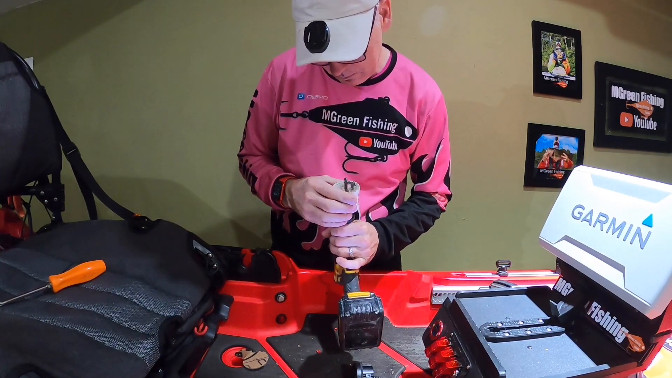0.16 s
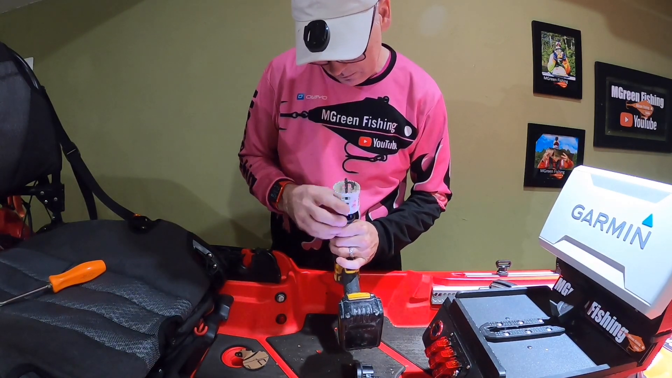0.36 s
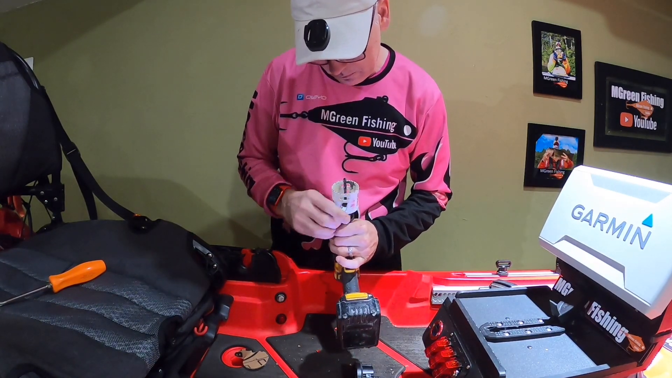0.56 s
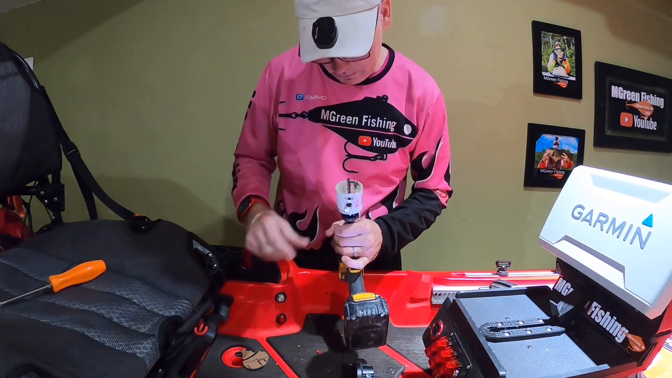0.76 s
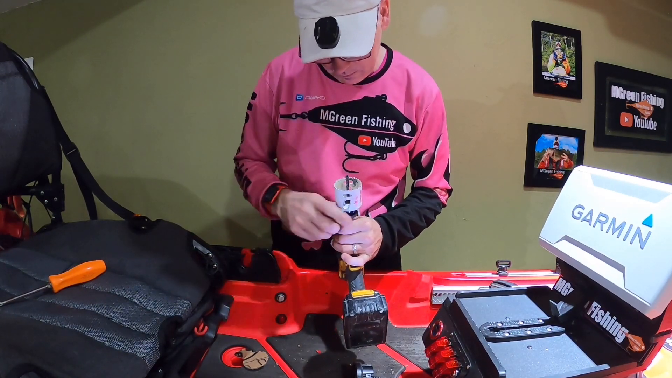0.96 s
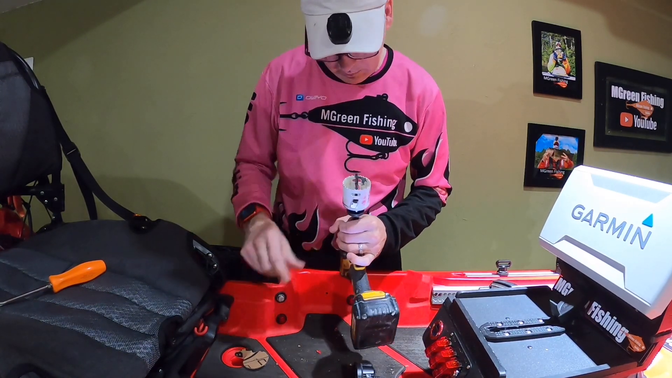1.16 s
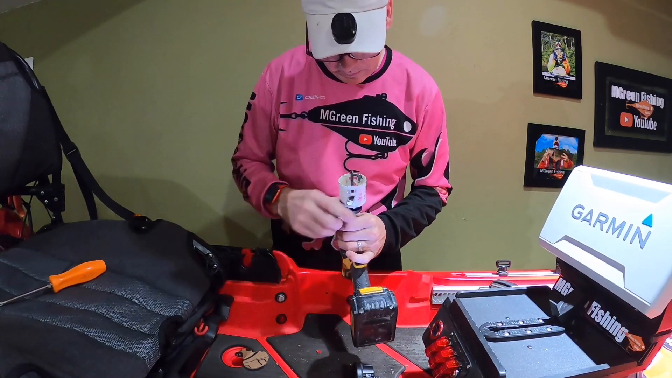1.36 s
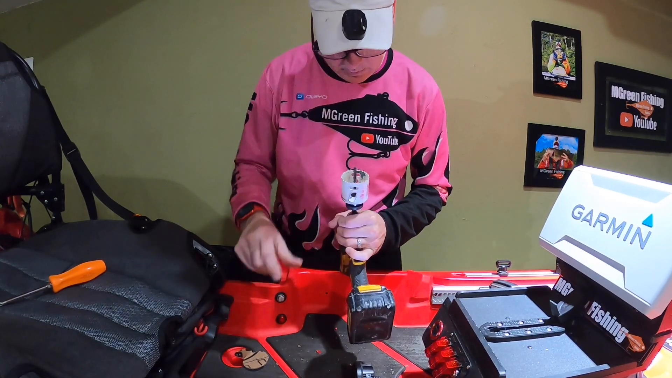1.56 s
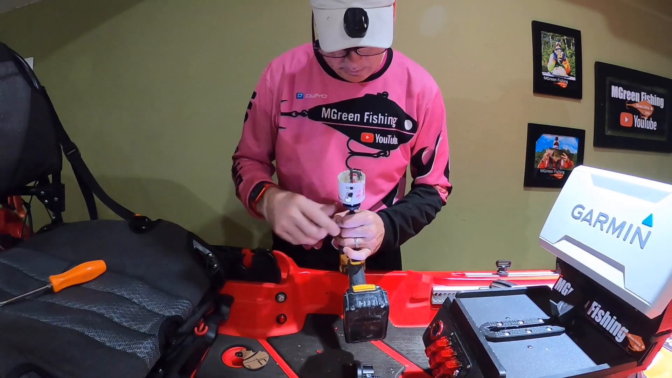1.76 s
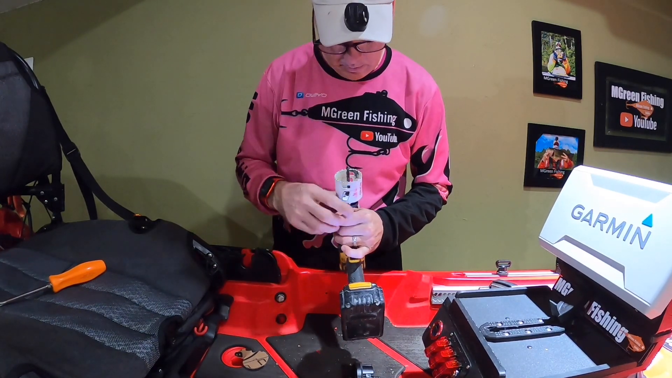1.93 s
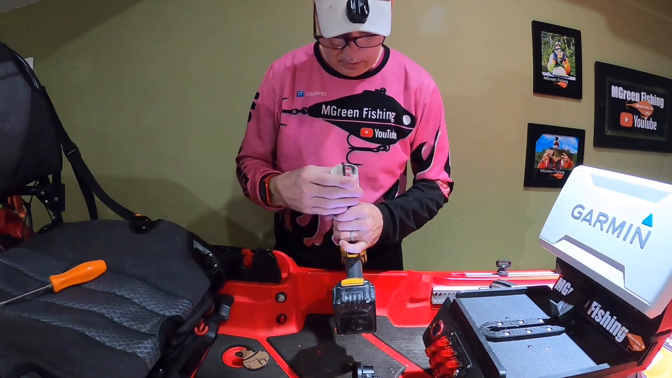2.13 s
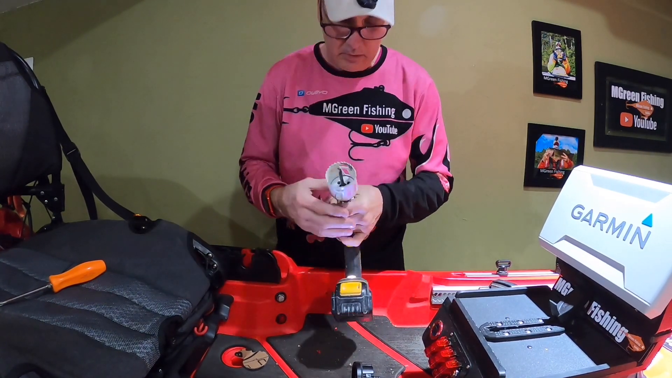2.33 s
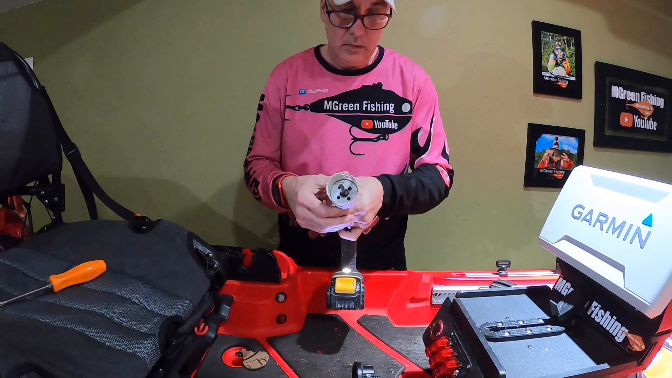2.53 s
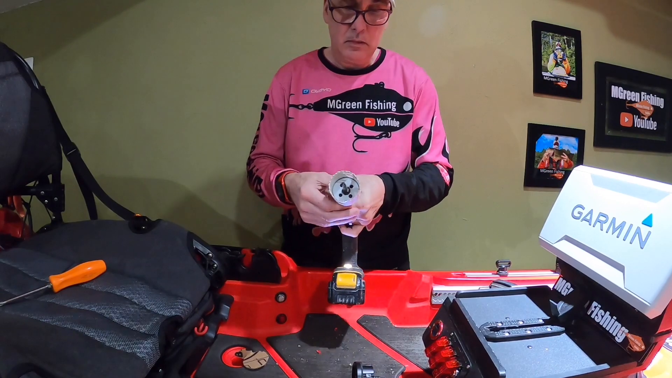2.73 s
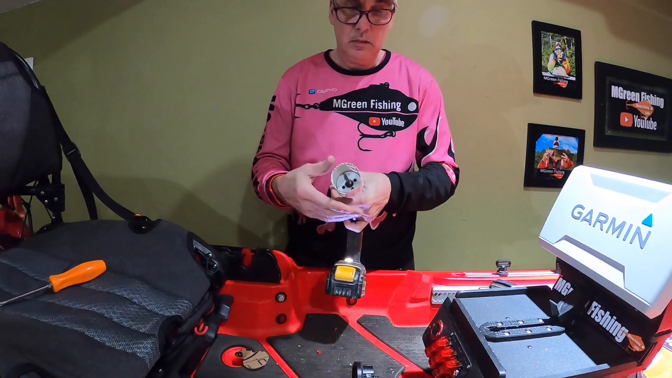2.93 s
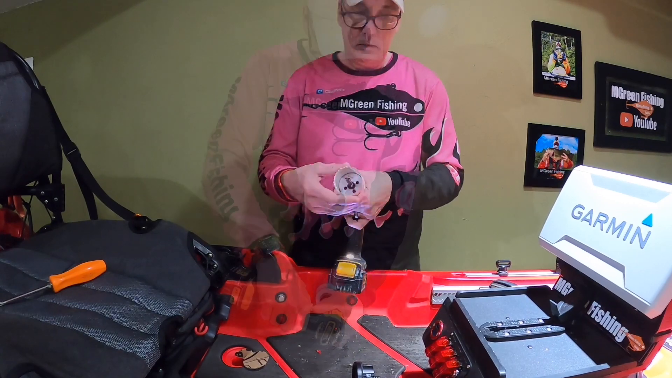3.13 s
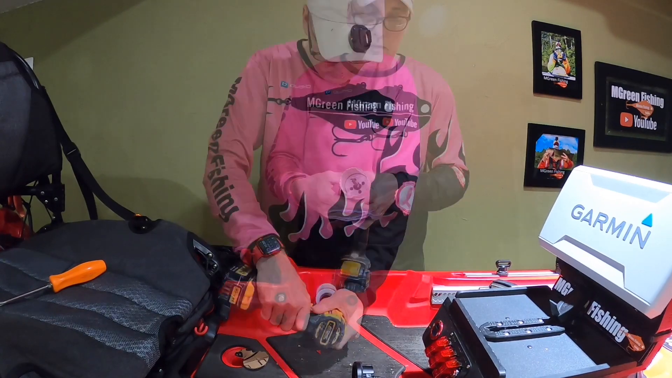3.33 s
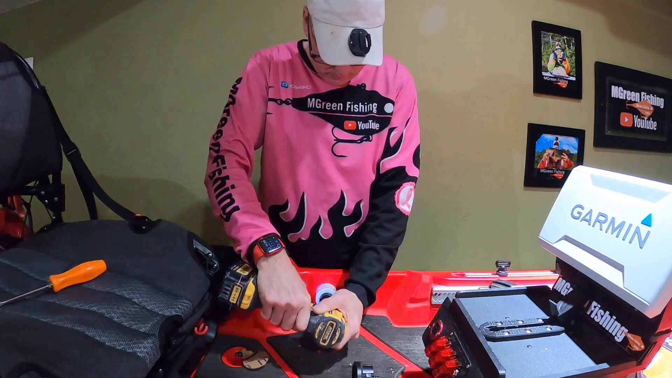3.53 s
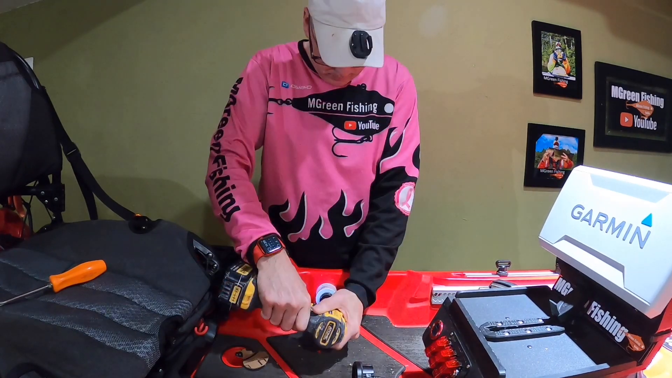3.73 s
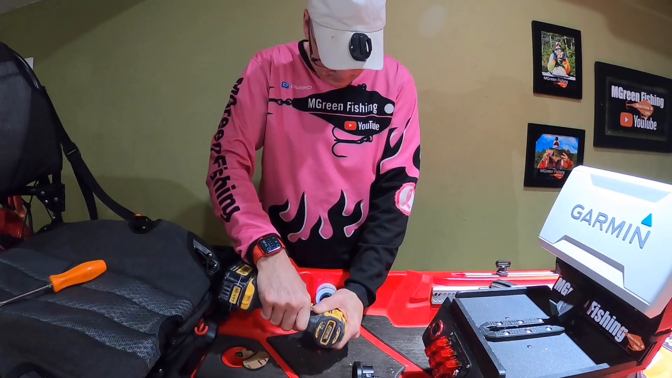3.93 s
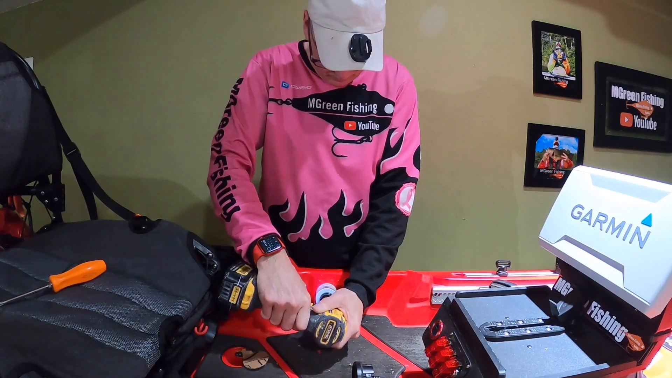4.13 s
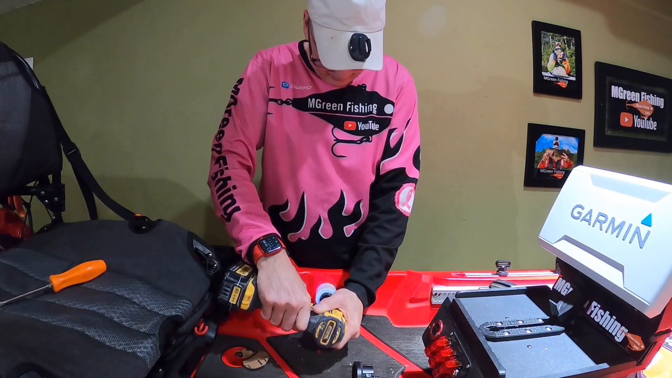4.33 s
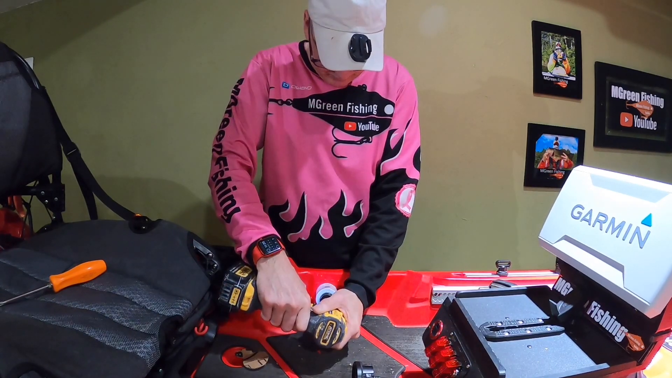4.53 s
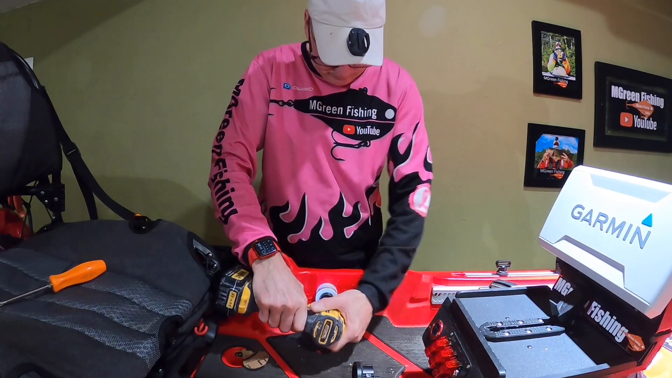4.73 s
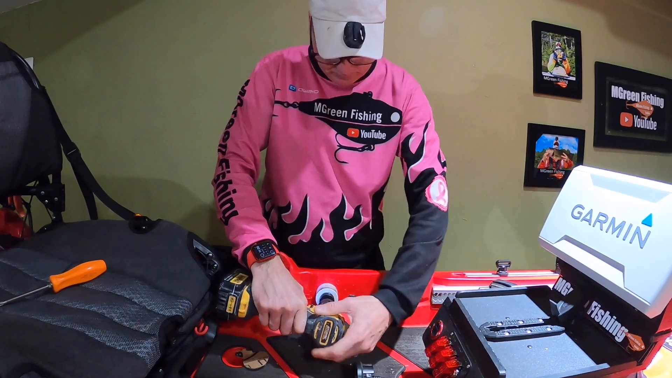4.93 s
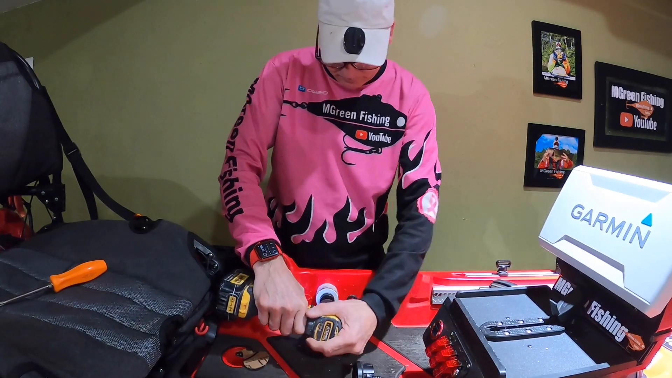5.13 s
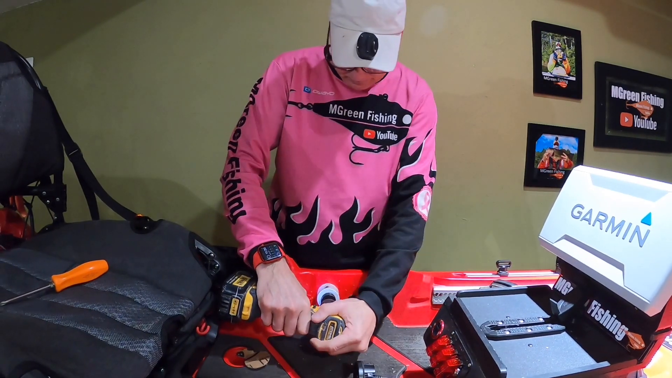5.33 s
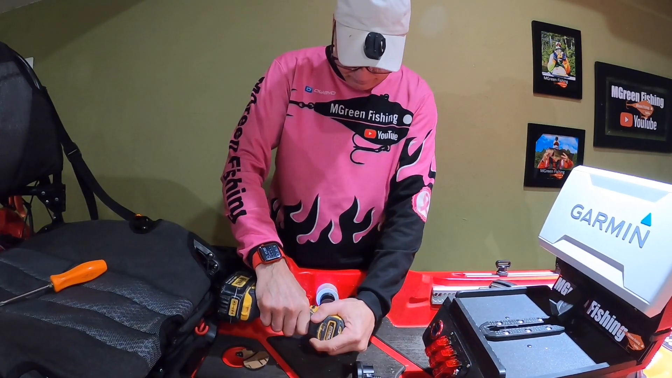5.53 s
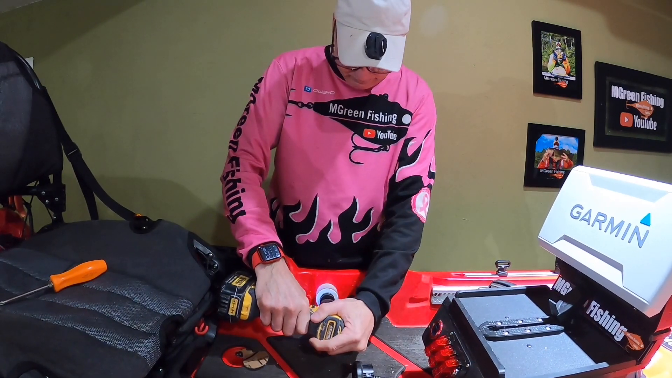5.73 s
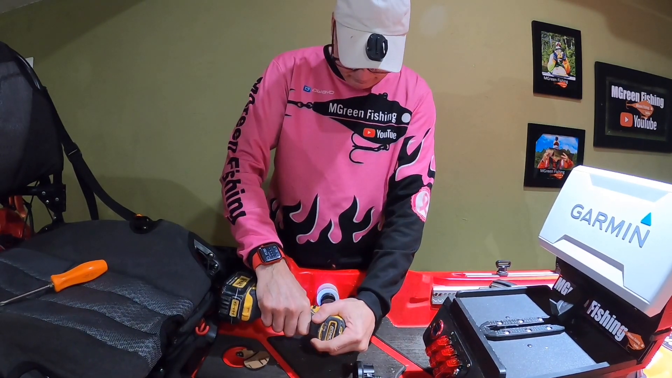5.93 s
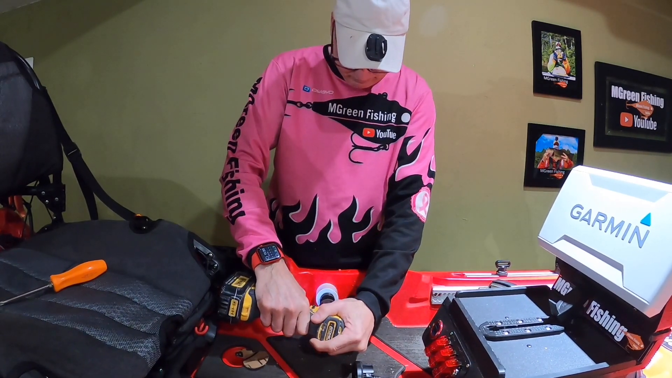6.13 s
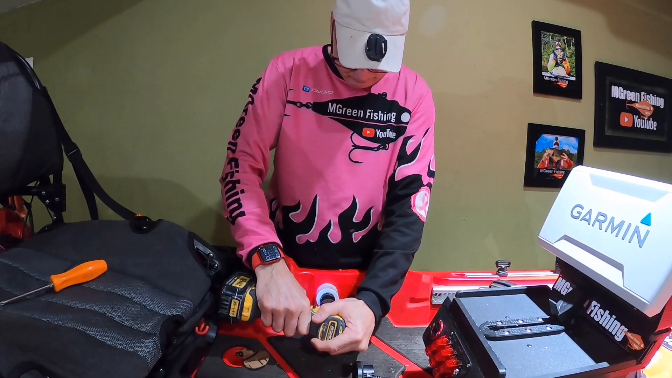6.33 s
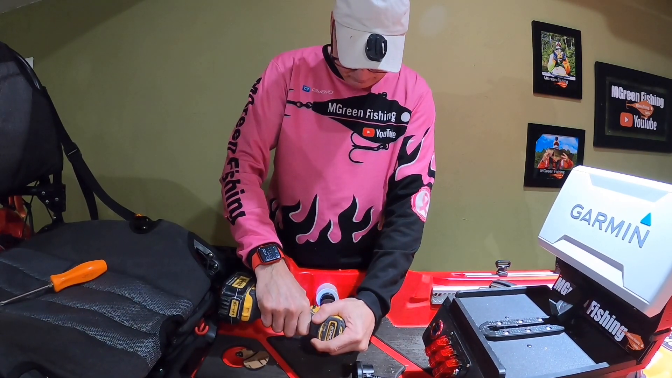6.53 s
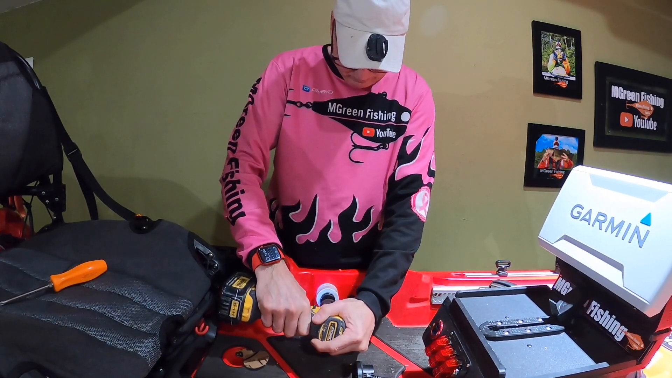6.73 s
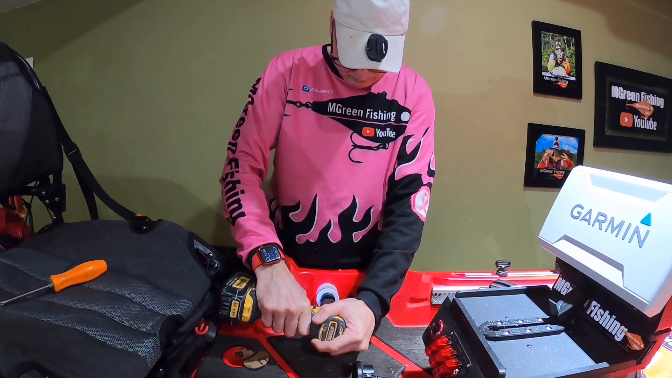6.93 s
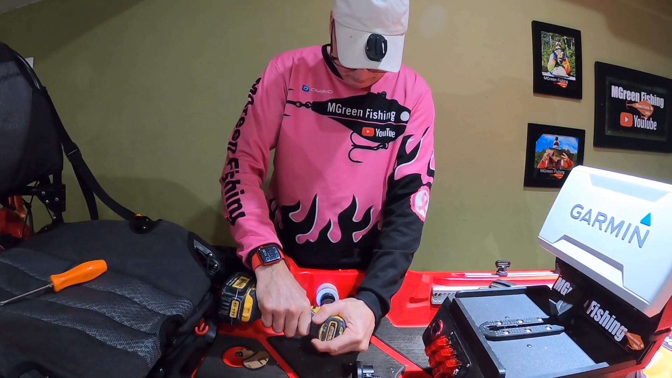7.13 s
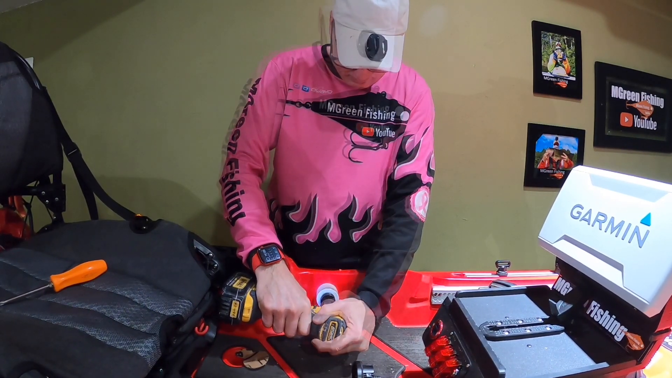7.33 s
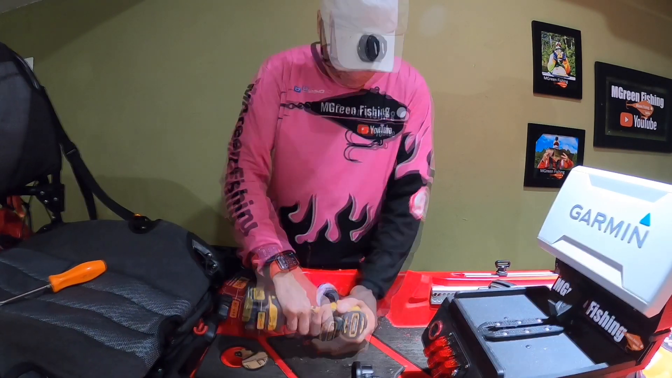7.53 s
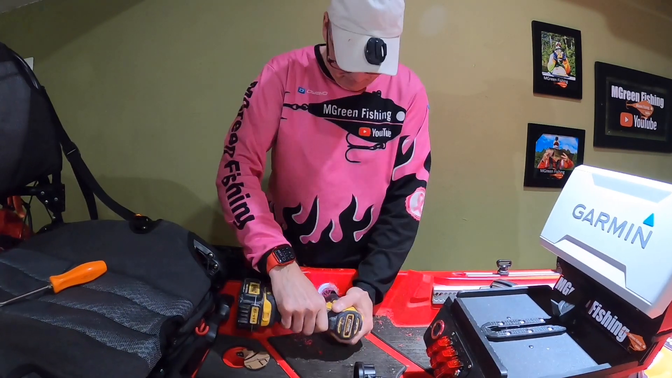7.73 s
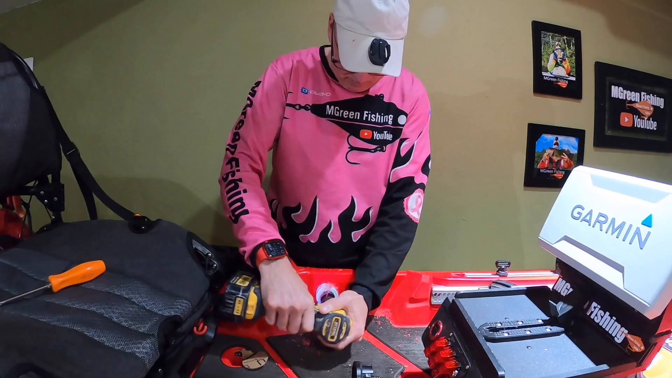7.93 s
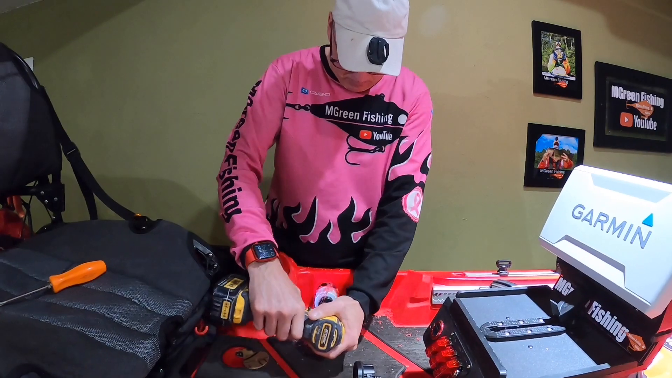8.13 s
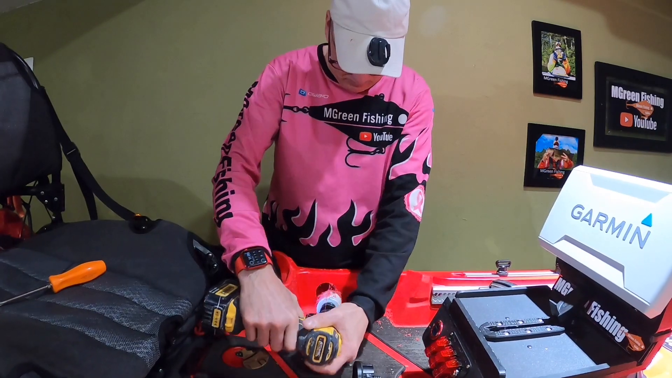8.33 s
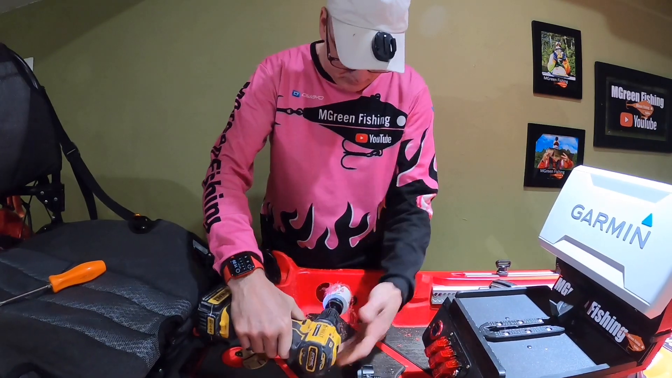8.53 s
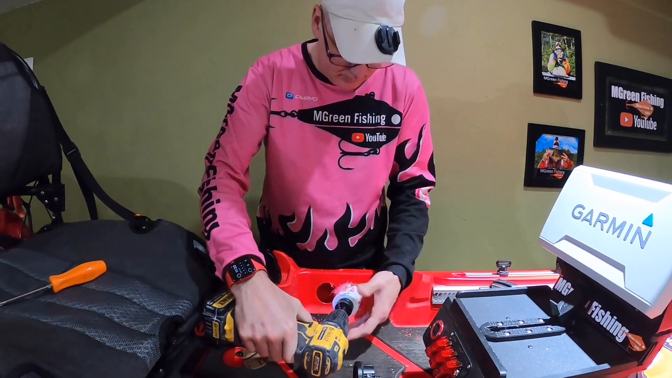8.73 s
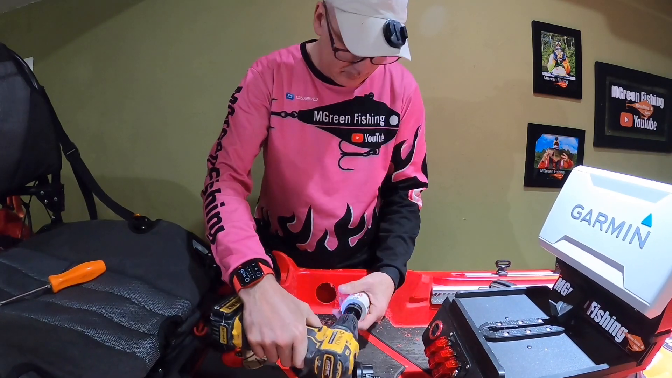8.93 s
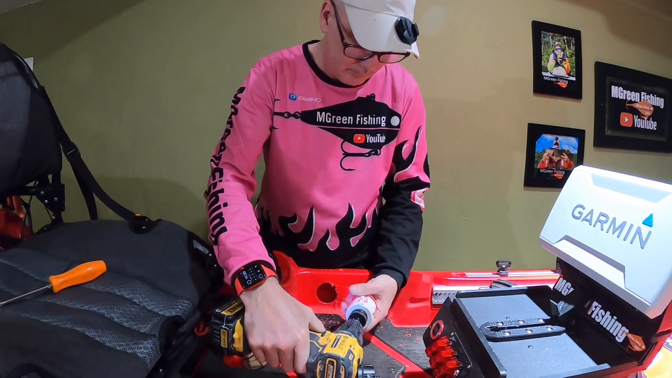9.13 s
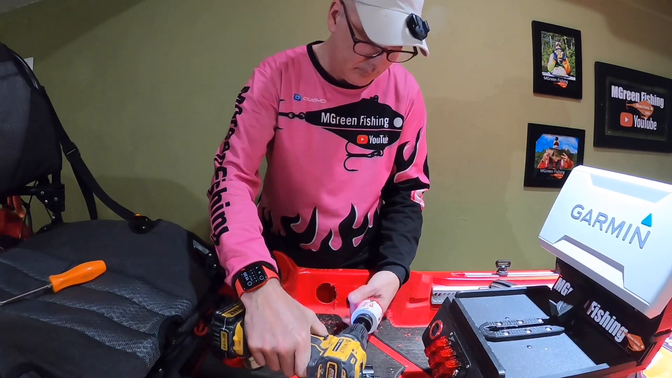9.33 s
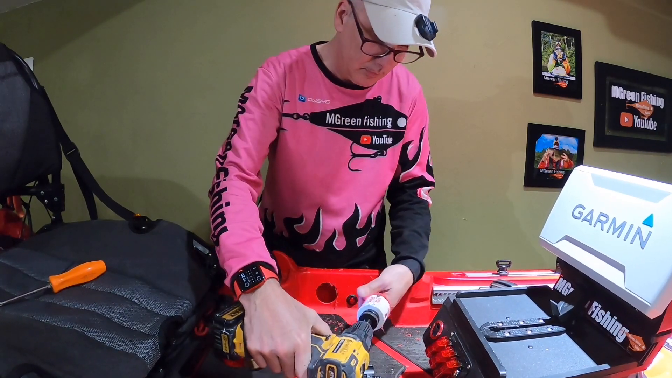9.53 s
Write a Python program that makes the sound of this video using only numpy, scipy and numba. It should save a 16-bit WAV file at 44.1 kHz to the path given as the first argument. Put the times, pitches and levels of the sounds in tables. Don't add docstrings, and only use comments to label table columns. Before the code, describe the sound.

Heard from about a metre by a small stereo microphone: quiet room rumble, several ringing clinks of a metal cup, the last firmest. Then a cordless drill grinds through a hollow plastic shell for almost five seconds, growling, squealing and whining at changing speeds. It bursts through with clustered hollow thuds and winds down abruptly, leaving brief rubbing strokes, a deck knock, cloth rustle and tiny ticks in a short, dry room.

```python
import sys
import numpy as np
from scipy import signal
from scipy.fft import rfft, irfft, next_fast_len
from scipy.io import wavfile
from scipy.ndimage import uniform_filter1d
from numba import njit

SR = 44100
rng = np.random.default_rng(int(sys.argv[2]) if len(sys.argv) > 2 else 0)


def digitize_waveform(pressure):
    field = np.atleast_2d(pressure).T
    bounded = np.clip(field, -1, 1)
    quanta = np.round(bounded * 32767).astype(np.int16)
    wavfile.write(sys.argv[1], SR, quanta)


def to_linear_factor(level_db):
    exponent = np.asarray(level_db, float) / 20
    return 10 ** exponent


N = 426006
T = np.arange(N) / SR
SIZE = next_fast_len(N + SR)
HZ = np.arange(SIZE // 2 + 1) * SR / SIZE

# frequency_hz, level_db (per Hz)
AIR = [(15, -53), (27, -22), (39, -4), (60, 2), (72, -4), (86, -16.5), (152, -10), (225, -29.5),
       (269, -30.5), (306, -37), (700, -54.5), (1110, -47), (2180, -56), (5970, -71), (12000, -82.5),
       (15600, -111), (22000, -120)]
# pitch_hz, level_db
HUM = [(1130, -82.5), (1330, -92.5)]
# frequency_hz, lead_rad
PORT_LEAD = [(30, -.03), (860, -.4), (2670, -.8), (6000, -1.1), (8000, -2.05), (10000, -1.7), (14000, -3.5)]
# frequency_hz, difference_db
PORT_LEVEL = [(60, 0), (110, 1.5), (200, 1.5), (380, 1), (700, 1), (1290, 0.5), (2380, 2.0), (4400, 1.5),
              (8120, 0.0), (15000, -17.5)]
# frequency_hz, level_db
ROOM_SHARE = [(60, -29.5), (300, -15.5), (1000, -8.5), (3000, -20.5), (6000, -10), (9000, -9),
              (14000, -13.5)]
# start_s, end_s, level_db, fade_db_per_s
BRUSHES = [(8.05, 8.117, -65.5, 302), (8.455, 8.52, -74, 300), (8.641, 8.77, -80, 202),
           (8.945, 9.05, -74.5, 104.5), (9.072, 9.227, -70, 300), (9.303, 9.37, -71, 98),
           (9.602, 9.66, -75.5, 205)]
# centre_hz, width_hz, level_db
CLOTH_BANDS = [(2900, 900, -3), (4300, 1300, 0), (5800, 1400, -2), (7300, 1400, -4), (9500, 1600, -6),
               (12000, 2500, -13)]
# start_s, end_s, level_db, fade_db_per_s, centre_hz
STROKES = [(8.06, 8.103, -47.5, 250, 1500), (8.12, 8.16, -65, 92, 1200), (8.46, 8.514, -68, 200, 1140),
           (8.64, 8.677, -50.5, 101, 1130), (8.72, 8.785, -76, 400, 1040), (8.826, 8.88, -75, 98, 1200),
           (9.028, 9.045, -63, 198, 1450), (9.09, 9.12, -61.5, 200, 2100), (9.157, 9.221, -62.5, 300, 1790),
           (9.265, 9.303, -66.5, 100, 1630), (9.335, 9.37, -69, 97, 1770), (9.44, 9.5, -73.5, 100, 1490),
           (9.605, 9.66, -61.5, 199, 1710)]
# start_s, peak_db, sharpness (0-1)
THUDS = [(3.2597, -12.5, 0.92), (3.273, -16.5, 0.43), (3.288, -17.5, 0.13), (7.472, -20, 0.3),
         (7.51, -10, 0), (7.533, -18, 0.03), (7.569, -15, 0.35), (7.599, -16.5, 0.44), (7.683, -14, 0.05),
         (7.76, -17.5, 0.3), (7.837, -20.5, 0.8), (7.95, -29, 0.1), (8.06, -17.5, 0.06), (8.621, -28.5, 0)]
# pitch_hz, level_db, t60_s
HULL = [(102, -5.5, 0.2), (137, -0.5, 0.17), (247, -7.5, 0.047), (290, -5.5, 0.33), (381, -2.5, 0.54),
        (474, -22, 0.17), (533, -18.5, 2.1), (662, -26, 4.7)]
# start_s, peak_db
KNOCKS = [(8.6195, -27)]
# pitch_hz, level_db, t60_s
DECK = [(150, -8.5, 5.0), (624, -29, 0.22), (670, -27.5, 5.0), (1005, -2, 0.13), (980, -17, 0.34),
        (1140, 0, 0.1), (1260, -23, 0.44), (1357, -30, 1.1), (1470, -29, 0.8), (1813, -3, 0.24),
        (1997, -32.5, 5.0)]
# start_s, peak_db, centre_hz, width_hz
TICKS = [(2.2149, -56.5, 2700, 1800), (3.066, -50, 2000, 2500), (7.468, -17.5, 1500, 700),
         (7.47, -17, 3000, 800), (7.8296, -25, 3920, 1787), (7.9024, -24, 3000, 1200),
         (7.934, -23, 4340, 1800), (7.9483, -21.5, 1800, 1200), (7.95, -22, 3250, 1810),
         (8.0475, -33.5, 2037, 900), (8.062, -33, 2810, 1000), (8.599, -53, 1800, 1800),
         (8.864, -60, 2550, 700), (9.5347, -52, 4180, 1210), (8.438, -54.5, 2400, 1000),
         (9.077, -50, 2230, 1200)]
# start_s, peak_db, centre_hz, width_hz
PINGS = [(2.4664, -58, 5010, 3500), (2.7355, -52.5, 5430, 3510), (8.3194, -69, 5530, 3500),
         (8.4155, -58.5, 4100, 3520), (8.454, -56, 5830, 2500), (8.535, -65, 11000, 4000),
         (8.365, -69, 6300, 1200), (8.92, -67, 10000, 4000), (9.4682, -59, 5900, 2000),
         (9.487, -61, 5500, 1000), (9.535, -57, 5800, 1200), (9.535, -61, 9500, 1210)]
# start_s, peak_db, centre_hz, width_hz
TAPS = [(3.258, -20, 600, 600), (2.846, -48, 1220, 900), (8.458, -57, 1060, 900), (8.554, -50, 1278, 894),
        (9.025, -54, 1470, 920), (9.568, -49, 1194, 880)]
# start_s, peak_db, centre_hz, width_hz
SNAPS = [(7.934, -27.5, 7100, 6000), (7.9483, -27, 6500, 6000), (8.09, -53, 6000, 5000)]
# start_s, peak_db, contact_ms, held_t60_s (what the fingers allow), spot struck
CLINKS = [
    (0.6609, -36, 2.5, .5, "lip"),
    (0.6833, -26, 3, .65, "rim"),
    (0.8639, -27, 2.5, .5, "teeth"),
    (1.0949, -32, 1, .3, "edge"),
    (1.1218, -29, 5, 1.1, "wall"),
    (1.1394, -32, 2.5, .3, "edge"),
    (1.484, -34, .9, .4, "wall"),
    (1.5555, -15, 2, .6, "base"),
]
# start_s, end_s, level_db, fade_db_per_s, dull_part_db
SLIDES = [(0.668, 0.877, -53, 280, -4), (1.111, 1.125, -47, 91, -10), (1.499, 1.538, -51, 189, -7),
          (1.56, 1.59, -55, 155.5, -19)]
SPOTS = {"lip": (-19, 2, -38, -26, -30), "rim": (-10, 2.5, -32, -14.5, -25),
         "teeth": (-33, -19, -22.5, 1, -36), "wall": (-4, -9.5, -19, -19, -26),
         "edge": (-20, -10, -34, -7, -27), "base": (-15, -2.5, -31.5, -25, -13)}
# pitch_hz, level_db, t60_s
CUP_LOW = [(1852, 0, 1.1), (1868, -9, .4), (1529, -6, .15), (2150, -8, .06)]
CUP_RIM = [(4925, 0, .14), (4985, -6, .09), (4624, -6, .1), (3467, -12, .1), (5550, -16, .05)]
CUP_MIDDLE = [(3817, 0, .9), (6708, -1, .55), (3391, -6, .4), (6923, -9, .24)]
CUP_HIGH = [(9453, -4, .12), (9700, 0, .035), (10050, -8, .06), (10640, -16, .1), (11090, -18, .08),
            (8700, -15, .1)]
CUP_BASE = [(4113, 0, .24), (4170, -6, .08)]
CUP = (CUP_LOW, CUP_RIM, CUP_MIDDLE, CUP_HIGH, CUP_BASE)
# start_s, peak_db, centre_hz
CHIPS = [(3.3947, -23, 3870), (3.5324, -17, 2590), (3.7065, -15.5, 2570), (3.9235, -16.5, 3870),
         (3.9754, -17, 3760), (4.135, -17, 2530), (4.2428, -10.5, 1510), (4.4793, -14, 2540),
         (4.9652, -18, 2060), (5.1023, -16.5, 4340), (5.2021, -20, 2050), (5.3902, -21, 3820),
         (5.4615, -14, 2500), (5.5404, -15.5, 2490), (5.5927, -14, 2510), (5.7429, -16, 3330),
         (6.1295, -15.5, 2890), (6.2887, -13, 3250), (6.6733, -14, 2220), (6.9377, -10.5, 2370)]
# start_s, end_s, start_hz, end_hz, level_db
GLIDES = [(5.449, 5.53, 2250, 4000, -43), (5.485, 5.552, 1350, 2450, -33), (5.45, 5.475, 2340, 2500, -30),
          (5.5, 5.54, 3750, 3910, -33.5), (5.54, 5.605, 2400, 2580, -32), (5.534, 5.582, 2700, 3280, -28),
          (7.487, 7.51, 3900, 3980, -40), (7.535, 7.6, 3950, 3620, -45), (7.672, 7.738, 4050, 3780, -40),
          (7.723, 7.803, 2000, 1810, -48), (7.82, 7.87, 4050, 3664, -46.5), (7.845, 7.903, 1600, 1290, -51),
          (7.88, 7.926, 3900, 3670, -48)]
# time_s, pitch_hz, level_db
GEAR = [(5.43, 180.2, -42.5), (5.47, 271.7, -33), (5.514, 386, -28.5), (5.561, 521, -32.5),
        (5.602, 546.7, -25), (6.4, 542.4, -28), (6.446, 490.5, -31.5), (6.5, 477, -40.5)]
# time_s, pitch_hz, level_db
WHINE = [(5.56, 8390, -58), (5.6, 8390, -46), (5.9, 8320, -45), (6.4, 8245, -47), (6.46, 8220, -60)]
# start_s, end_s, pitch_drift_percent
GRIPS = [(3.08, 4.75, -1.3), (4.75, 5.23, 3), (5.23, 5.56, 2), (5.47, 6.48, -.5), (6.72, 7.27, -.2),
         (6.48, 7.45, -.4)]
# pitch_hz, width_hz, level_db
SINGS = [
    [(265, 60, -35), (555, 60, -43), (738, 70, -38), (1220, 250, -41), (2575, 40, -35), (2510, 40, -42),
     (3030, 100, -42), (3760, 90, -41), (3930, 50, -36.5), (4230, 60, -41), (5100, 80, -49),
     (6450, 90, -55), (7500, 100, -57), (12000, 200, -70), (9050, 200, -53)],
    [(725, 70, -42), (1090, 350, -35), (2025, 90, -35), (4150, 150, -42)],
    [(200, 60, -32), (400, 150, -33), (760, 150, -36), (2250, 120, -40), (3800, 100, -36)],
    [(3100, 800, -35), (2410, 100, -37), (2925, 80, -41), (3265, 120, -41), (4320, 120, -42)],
    [(4228, 50, -39)],
    [(3200, 800, -36), (400, 90, -35), (2205, 60, -40), (2385, 100, -37), (2935, 80, -41), (4250, 200, -40),
     (8600, 700, -53)],
]
# start_s, end_s, start_hz, end_hz, level_db
SQUEALS = [(4.75, 5.02, 560, 550, -35), (5.05, 5.2, 550, 550, -36), (5.05, 5.15, 8600, 8600, -55),
           (7.05, 7.5, 555, 555, -37), (7.52, 7.55, 1700, 1700, -31), (7.61, 7.67, 3150, 3050, -36),
           (7.69, 7.72, 3050, 3000, -32), (7.74, 7.78, 3050, 3050, -31)]
# frequency_hz, level_db (per Hz)
CUT_COLOUR = [(53, -59), (90, -25.5), (154, 4.5), (218, 4), (350, -6), (550, -6.5), (599, -10),
              (902, -11.5), (2430, -12.5), (3820, -16), (6410, -31.5), (8480, -30), (15500, -60)]
# time_s, level_db
BITE = [(3.05, -96), (3.08, -52.5), (3.13, -45.5), (3.22, -38), (3.36, -31.5), (3.6, -27.5), (4.71, -27),
        (4.8, -28.5), (5.22, -28), (5.27, -31.5), (5.41, -30), (5.47, -25.5), (7.2, -24.5), (7.55, -27),
        (7.9, -39), (7.96, -40.5), (8.02, -52), (8.25, -76)]
# time_s, pitch_hz
SPEED = [(3.1, 225.6), (4.7, 223.3), (4.78, 195.5), (5.22, 181.9), (5.3, 147.5), (5.55, 157.6),
         (5.62, 221.1), (6.42, 216), (6.52, 167.9), (7.5, 168.1), (7.87, 145)]

TEETH_PER_TURN, TOP_HZ = 8.6, 233.5
THROUGH_S = 7.84
JOLT_S, SWAY_S = .022, .07


def table(rows, off_db=None):
    s, *columns = np.transpose(rows)
    return [np.interp(T, s, c, off_db, off_db) for c in columns]


def pitch_and_level(rows):
    (hz,) = table([row[:2] for row in rows])
    (db,) = table([row[::2] for row in rows], -120)
    return hz, db


def over_hz(rows):
    hz, v = np.transpose(rows)
    return np.interp(np.log(HZ + 1), np.log(hz + 1), v)


def shape(x, gain):
    return irfft(rfft(x, SIZE) * gain, SIZE)[..., :N]


def band(lo_hz, hi_hz):
    return 1 / np.sqrt((1 + (lo_hz / (HZ + 1)) ** 8) * (1 + (HZ / hi_hz) ** 8))


def unit(x):
    return x / np.sqrt(np.mean(x ** 2))


def walk(rate):
    k = int(SR / rate)
    steps = np.repeat(rng.standard_normal(N // k + 1), k)
    return unit(uniform_filter1d(uniform_filter1d(steps, k), k)[:N])


def grit(spread_db):
    size = np.minimum(rng.exponential(size=N), 4)
    return unit(rng.standard_normal(N) * to_linear_factor(spread_db * size))


def ring(modes, longest_s=.8):
    t = np.arange(int(longest_s * SR)) / SR
    y = np.zeros(len(t))
    for hz, db, t60 in modes:
        y += to_linear_factor(db) * np.sin(2 * np.pi * hz * t) * 1000. ** (-t / min(t60, longest_s))
    return y / np.abs(y).max()


def add(out, s, x):
    i = int(s * SR)
    out[i:i + len(x)] += x[:N - i]


@njit
def svf(x, hz, width):
    y, b, l = np.empty(len(x)), 0., 0.
    for i in range(len(x)):
        g, k = np.tan(np.pi * hz[i] / SR), width / hz[i]
        v = (b + g * (x[i] - l)) / (1 + g * (g + k))
        b, l, y[i] = 2 * v - b, l + 2 * g * v, k * v
    return y


def tone(hz, db, wobble, flutter_db):
    phase = np.cumsum(hz * (1 + wobble * walk(30))) / SR
    return np.sqrt(2) * to_linear_factor(db + flutter_db * walk(25)) * np.sin(2 * np.pi * phase)


def stroke(start, end, db, fade, rise):
    return to_linear_factor(db - rise * np.maximum(start - T, 0) - fade * np.maximum(T - end, 0))


def jolts(length_s):
    out = np.zeros(N)
    for s, db, _ in THUDS:
        u = np.clip((T - s) / length_s + .5, 0, 30)
        out += to_linear_factor(db) * u * np.exp(1 - u)
    return out


def workshop():
    mid, left, right = rng.standard_normal((3, N))
    apart = np.clip((HZ - 60) / 600, 0, 1)
    pair = shape(mid, np.sqrt(1 - apart ** 2)) + shape(np.array([left, right]), apart)
    air = unit(shape(pair, to_linear_factor(over_hz(AIR))))
    low = shape(air, band(1, 105))
    rumble = to_linear_factor(-41.5 + .6 * walk(0.93)) + to_linear_factor(-37.5) * jolts(SWAY_S)
    tilt = to_linear_factor(np.array([[1.1], [-1.1]]))
    hum = sum(tone(hz + 0 * T, db, 0.00057, 1.5) for hz, db in HUM)
    return (unit(low) * rumble + (air - low) * to_linear_factor(-38.5)) * tilt + hum


def sleeve():
    gain = sum(stroke(*row, 300) for row in BRUSHES)
    grain = grit(2.) * to_linear_factor(1.3 * walk(60))
    rustle = np.zeros(N)
    for hz, width, db in CLOTH_BANDS:
        level = to_linear_factor(db + 1.5 * walk(18))
        y = svf(grain, hz * (1 + .04 * walk(9)), 1. * width)
        rustle += level * unit(svf(y, hz + 0 * T, 1.5 * width))
    return gain * unit(rustle)


def rubbing():
    db = 20 * np.log10(sum(stroke(*row, 600) for row in (r[:4] for r in STROKES)) + 1e-9)
    (hz,) = table([(row[0], row[-1]) for row in STROKES])
    octaves = np.log2(hz / 1000)
    hz = hz * (1 + .05 * walk(15))
    hollow_db = db + 8.5 - 16.5 * octaves
    grain = grit(2.1) * to_linear_factor(1.6 * walk(45))
    body = svf(svf(svf(grain, hz, 780.0), hz, 1400.0), hz, 2100.0)
    upper_hz = 2.5 * hz
    upper = svf(svf(grain, upper_hz, 830.0), upper_hz, 1100.0)
    body = unit(body) + to_linear_factor(-14) * unit(upper)
    hollow = shape(grain, band(190, 650))
    return unit(body) * to_linear_factor(db + 1.0) + unit(hollow) * to_linear_factor(hollow_db - 4.5)


def thuds():
    out, hull = np.zeros(N), ring(HULL, 0.14)
    for s, db, sharp in THUDS:
        push = np.hanning(int(SR * 0.0034 * (1 - np.clip(sharp, 0, .9))) + 3)
        add(out, s, to_linear_factor(db + 3.5) * np.convolve(hull, push / push.sum()))
    return out


def knocks():
    out, t = np.zeros(N), T[:1500]
    deck = np.convolve(ring(DECK, 0.054), np.ones(7) / 7)
    for s, db in KNOCKS:
        add(out, s, to_linear_factor(db + 6.0) * deck)
        burst = rng.standard_normal(len(t)) * np.exp(-t / 0.0082) * np.minimum(t / .0006, 1)
        burst = shape(burst, band(540, 2200) + 0.051 * band(2600, 5300))[:len(t)]
        add(out, s, to_linear_factor(db + 5.0) * burst)
    return out


def ticks():
    out, t = np.zeros(N), T[:1500]
    for s, db, hz, width in TICKS + PINGS + TAPS + SNAPS:
        tick = rng.standard_normal(len(t)) * np.exp(-t / 0.0063) * np.minimum(t / .0004, 1)
        for _ in range(3):
            tick = svf(tick, np.full(len(t), 1. * hz), max(1. * width, 100.))
        add(out, s, to_linear_factor(db - 2.5) * tick / np.abs(tick).max())
    return out


def clinks():
    out, t, tail = np.zeros(N), T[:3000], T[:SR // 4]
    for s, db, contact_ms, held_s, spot in CLINKS:
        u = t / (contact_ms / 1000)
        crack = rng.standard_normal(len(t)) * u * np.exp(1 - u)
        crack = shape(crack, band(1100, 4800) + 0.34 * band(4400, 10500))[:len(t)]
        add(out, s, to_linear_factor(db - 1.5) * crack / np.abs(crack).max())
        shimmer = rng.standard_normal(len(tail)) * np.exp(-tail / 0.024)
        shimmer = shape(shimmer, band(8800, 10300))[:len(tail)]
        add(out, s, to_linear_factor(db + SPOTS[spot][3] - 10) * shimmer)
        for modes, rel_db in zip(CUP, SPOTS[spot]):
            cup = ring(modes, held_s)
            onset = 1 - np.exp(-T[:len(cup)] * 1000 / contact_ms)
            add(out, s, to_linear_factor(db + rel_db) * cup * onset)
    return out


def steel():
    rise = 900
    fine, dull = np.zeros(N), np.zeros(N)
    for start, end, db, fade, dull_db in SLIDES:
        fine += stroke(start, end, db, fade, rise)
        dull += stroke(start, end, db + dull_db, 0.55 * fade, rise)
    rub = grit(3.5) * to_linear_factor(1.5 * walk(70) + 1.8 * walk(250))
    rattle = unit(shape(rub, band(1500, 5200) + 0.066 * band(6000, 12000))) * fine * to_linear_factor(1.5)
    cup = ring(CUP_LOW)[:SR // 4] * to_linear_factor(-29) + ring(CUP_RIM)[:SR // 4] * to_linear_factor(-27)
    bowed = signal.fftconvolve(rub * fine, cup)[:N]
    scrape = unit(shape(rub, band(1000, 1800) + 1.3 * band(480, 625))) * dull * to_linear_factor(-2.0)
    return shape(clinks() + rattle, band(0.97, 13000) ** 2) + bowed + scrape


def pops():
    out, t = np.zeros(N), T[:600]
    for s, db, hz in CHIPS:
        pop = rng.standard_normal(len(t)) * t * np.exp(-t / 0.0018)
        for _ in range(2):
            pop = svf(pop, hz + 0 * t, 1500.)
        add(out, s, to_linear_factor(db - 5) * pop / np.abs(pop).max())
    return out


def whistles():
    out = np.zeros(N)
    wobble, flutter = 1 + .007 * walk(80), to_linear_factor(2.5 * walk(60))
    for t0, t1, hz0, hz1, db in GLIDES:
        i, j = int(t0 * SR), int(t1 * SR)
        phase = np.cumsum(np.linspace(hz0, hz1, j - i) * wobble[i:j]) / SR
        swell = flutter[i:j] * signal.windows.tukey(j - i, .6)
        out[i:j] += to_linear_factor(db + 3) * np.sin(2 * np.pi * phase) * swell
    return out


def motor(tooth_hz, turns):
    gear_hz, gear_db = pitch_and_level(GEAR)
    gear = tone(gear_hz, gear_db - 1.5, 0.006, 2.5) * (1 + 0.57 * np.cos(4 * np.pi * turns))
    whine_hz, whine_db = pitch_and_level(WHINE)
    whine = tone(whine_hz, whine_db + 3, .003, 2)
    twin = tone(whine_hz - tooth_hz, whine_db, .003, 2)
    return gear + whine + twin


def singing(bite_db, chatter):
    lines = []
    for (t0, t1, percent), modes in zip(GRIPS, SINGS):
        for hz, width, db in modes:
            lines.append((t0, t1, hz, hz * (1 + percent / 100), width, db))
    for t0, t1, hz0, hz1, db in SQUEALS:
        lines.append((t0, t1, hz0, hz1, .04 * hz0, db))
    bow = rng.standard_normal(N) * chatter
    out, drift = np.zeros(N), 1 + .005 * walk(8)
    for t0, t1, hz0, hz1, width, db in lines:
        i, j = int(t0 * SR), int(t1 * SR)
        centre = np.linspace(hz0, hz1, j - i) * drift[i:j]
        y = svf(svf(bow[i:j], centre, 1. * width), centre, 1.4 * width)
        out[i:j] += to_linear_factor(db) * unit(y) * signal.windows.tukey(j - i, .04)
    return out * to_linear_factor(np.clip(.75 * (bite_db + 28), -60, 3))


def kerf(turns, memory, count):
    fresh = rng.standard_normal((int(turns[-1]) + 2, count))
    groove = signal.lfilter([1], [1, -min(memory, .98)], fresh, axis=0).ravel()
    return unit(np.interp(turns * count, np.arange(groove.size), groove))


def drill():
    (tooth_hz,), (bite_db,) = table(SPEED), table(BITE, -120)
    turns = np.cumsum(tooth_hz / TEETH_PER_TURN) / SR
    octaves = np.log2(tooth_hz / TOP_HZ)
    colour, jolt = to_linear_factor(over_hz(CUT_COLOUR)), jolts(JOLT_S)
    wobble = np.cos(2 * np.pi * turns)
    lurch = np.cos(np.pi * turns)
    chatter = to_linear_factor(1.2 * walk(300) + .25 * walk(40))

    boom_gain = to_linear_factor(bite_db - 4.0 + 7 * octaves + 0.51 * walk(28)) + to_linear_factor(-16.5) * jolt
    boom = unit(shape(kerf(turns, 0.51, count=64), colour * band(110, 300)))
    boom = boom * boom_gain * to_linear_factor(0.74 * lurch + 0.31 * wobble)

    drone_gain = to_linear_factor(bite_db - 3.5 + 1.5 * octaves) + to_linear_factor(-26) * jolt
    drone = unit(shape(kerf(turns, 0.27, count=128), colour * band(360, 1100)))
    drone = drone * drone_gain * to_linear_factor(0.98 * wobble) * chatter

    chips = grit(1.5) * to_linear_factor(wobble + .6 * walk(25)) * chatter
    chips = chips * to_linear_factor(np.cos(2 * np.pi * TEETH_PER_TURN * turns + walk(40)))
    rasp = unit(shape(chips, colour * band(1080, 6000))) * to_linear_factor(bite_db - 2.0)

    gear_hz, gear_db = pitch_and_level(GEAR)
    trigger = np.clip((gear_hz - 200) / 200, 0, 1) * (gear_db > -60)
    air_db = -41.5 + 1.23 * (bite_db + 25.5) + 5 * trigger
    air = unit(shape(chips + 1.1 * grit(5.6), colour * band(4200, 16000))) * to_linear_factor(air_db + 6.0)

    sway = to_linear_factor(-25.5) * jolts(SWAY_S) * (T > GRIPS[-1][1])
    beat_db = 20 * np.log10(to_linear_factor(bite_db - 3.0 + 5 * octaves) + sway)
    beat_db = beat_db - 800 * np.maximum(T - THROUGH_S, 0) + 2.1 * lurch + 3.6 * wobble
    teeth = tone(tooth_hz, beat_db, 0.0069, 2.3)

    own = shape(rng.standard_normal((2, N)), colour * band(2500, 16000) * HZ / 8000)
    own = unit(own) * to_linear_factor((bite_db + air_db) / 2 - 6.0)
    cutting = boom + drone + rasp + air + teeth
    return cutting + motor(tooth_hz, turns) + singing(bite_db, chatter), own


def scene():
    cutting, spread = drill()
    blows = thuds() + knocks() + ticks()
    near = cutting + whistles() + pops() + steel() + blows + rubbing() + sleeve()
    port = to_linear_factor(over_hz(PORT_LEVEL) / 2) * np.exp(.5j * over_hz(PORT_LEAD))
    direct = np.array([shape(near, port), shape(near, 1 / port)])
    t = np.arange(SR // 2) / SR
    walls = rng.standard_normal((2, len(t))) * 1000. ** (-t / .19) * (t > .004)
    walls /= np.sqrt((walls ** 2).sum(axis=1, keepdims=True))
    room = shape(near, rfft(walls, SIZE) * to_linear_factor(over_hz(ROOM_SHARE)))
    return to_linear_factor(0.07) * direct + spread + room + workshop()


def top_cut(x):
    return signal.sosfilt(signal.butter(12, 15710, fs=SR, output="sos"), x)


def record(dry):
    top = signal.ellip(8, .2, 70, 15600, fs=SR, output="sos")
    mix = signal.sosfilt(top, dry)
    return top_cut(mix)


dry = scene()
out = record(dry)
digitize_waveform(out)
```